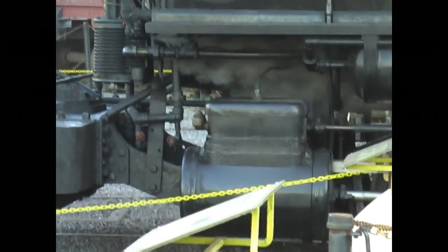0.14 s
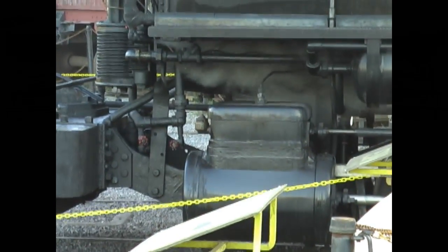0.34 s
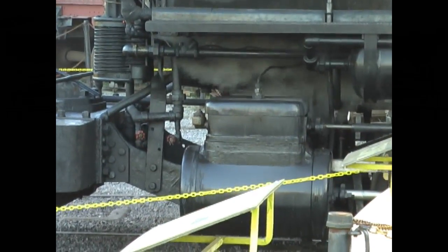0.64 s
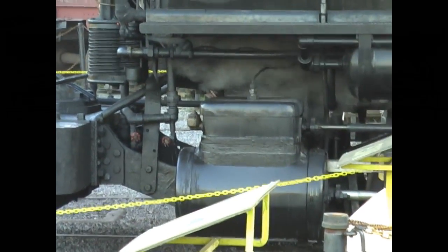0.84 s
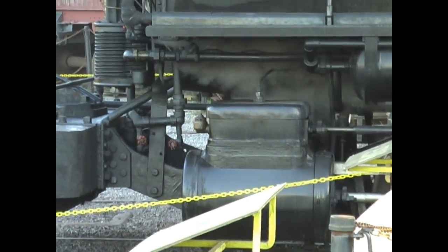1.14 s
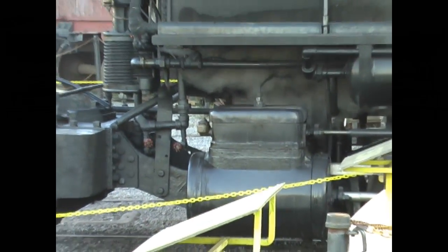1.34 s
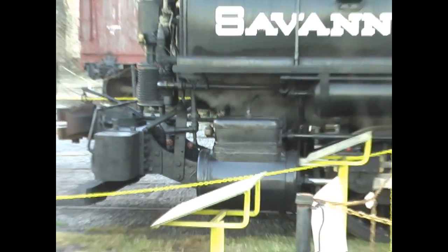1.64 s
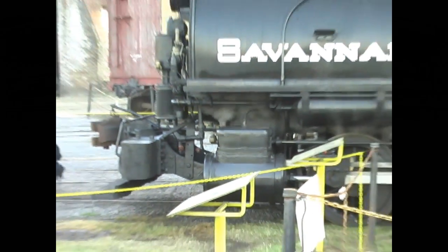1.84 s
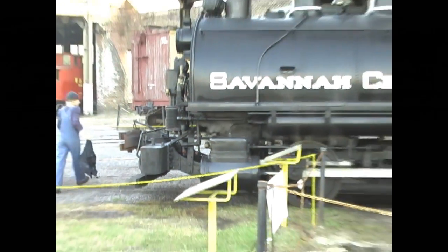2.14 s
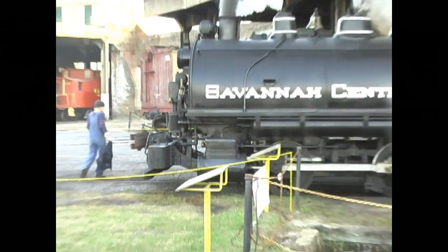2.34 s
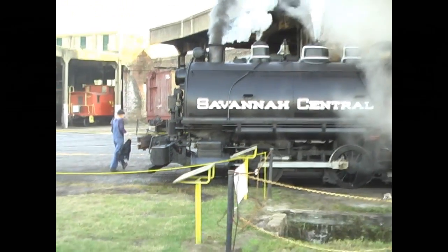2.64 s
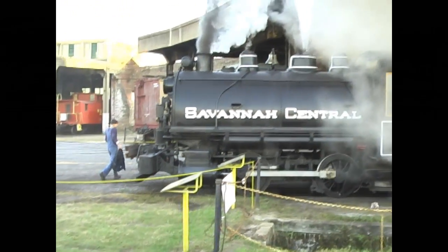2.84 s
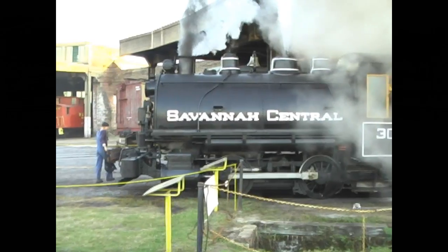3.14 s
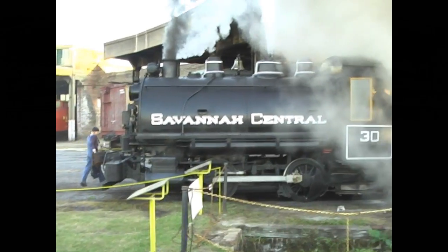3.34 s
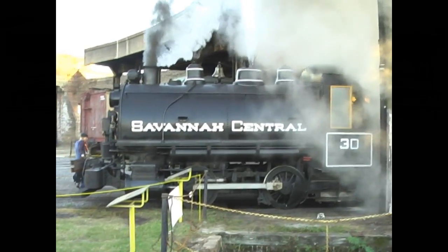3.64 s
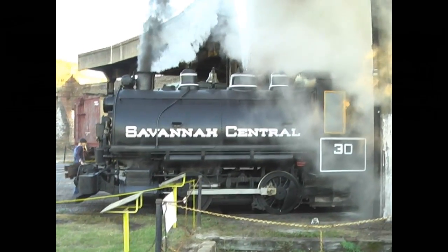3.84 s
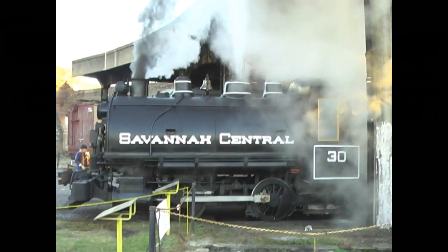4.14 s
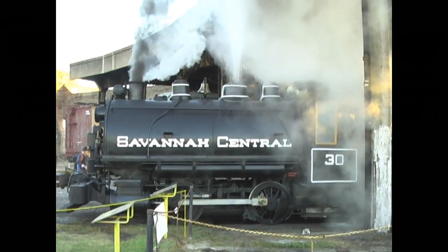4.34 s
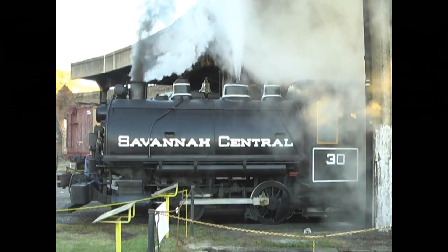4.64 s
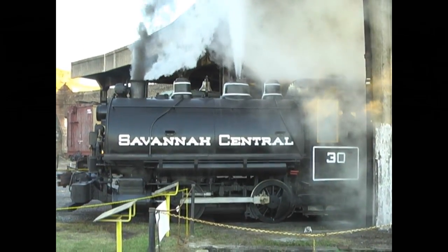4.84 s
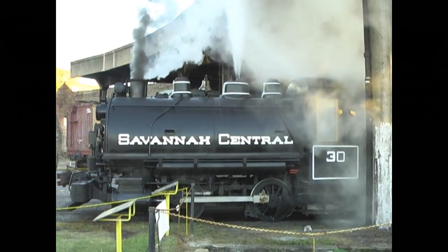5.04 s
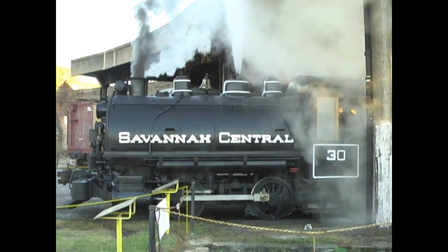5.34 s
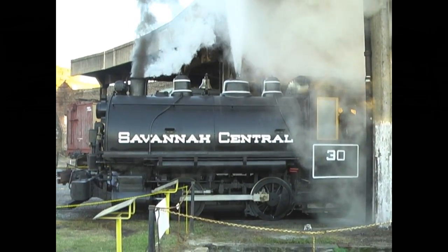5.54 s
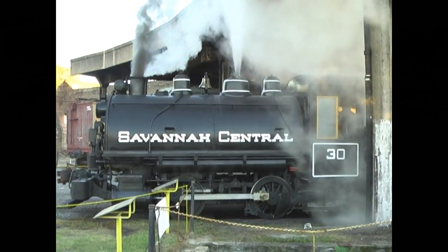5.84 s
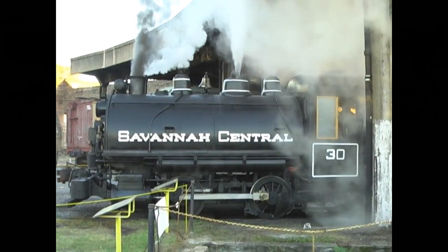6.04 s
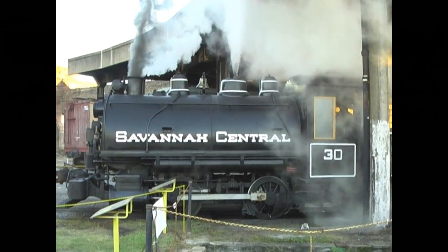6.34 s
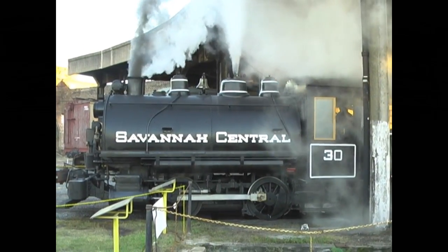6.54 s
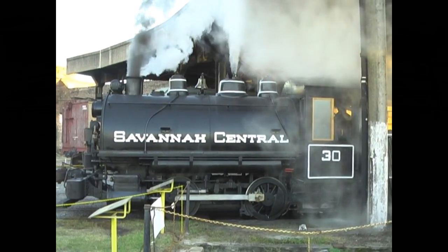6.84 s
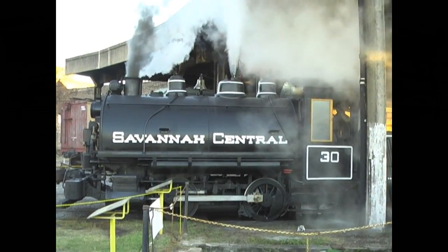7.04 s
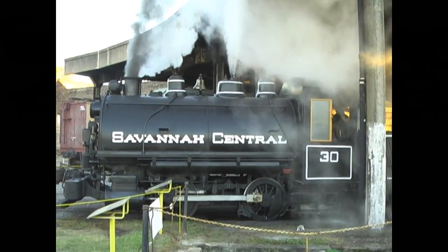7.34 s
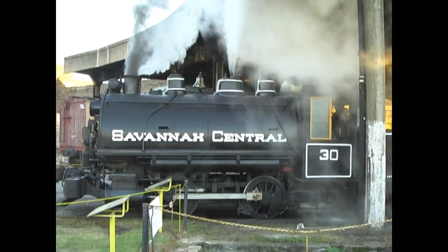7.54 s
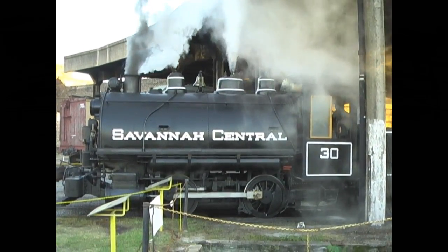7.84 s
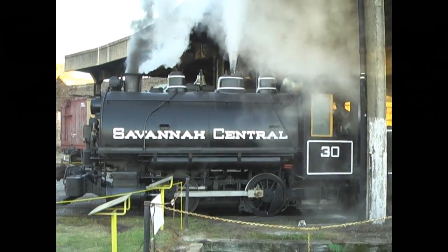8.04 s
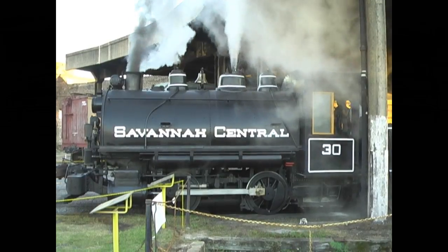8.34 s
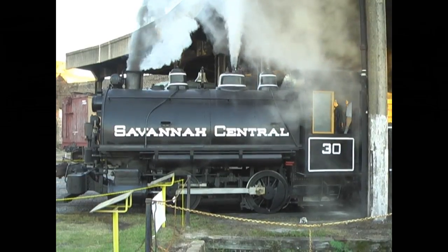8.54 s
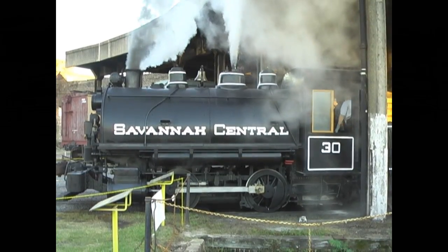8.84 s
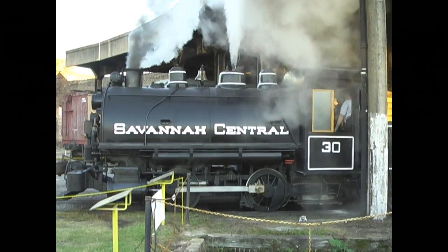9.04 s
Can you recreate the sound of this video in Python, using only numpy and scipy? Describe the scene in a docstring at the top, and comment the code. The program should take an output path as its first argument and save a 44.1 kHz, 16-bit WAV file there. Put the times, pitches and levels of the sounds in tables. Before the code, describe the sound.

A parked steam locomotive blows off steam in an open yard: a loud, continuous, bright hiss already at full level, with small fast flutters. A faint low blower roar and a barely audible hollow hum lie far beneath it. The tone shifts slightly as the stereo camera microphone turns, and around six seconds the hiss turns fuller in the middle while the roar weakens. No other events.

```python
"""In an open yard a standing steam locomotive blows off through its safety valve, heard at a camera's stereo ports.
The jet is turbulent noise, combed by echoes off boiler and ground, over the low noise of the blower's roar.
A hollow hum and a ring inside the hiss are noise in narrow resonances. The camera pans from the cylinders
to the cab, and near 6 s the sound fades over to a later moment with less roar and a fuller middle."""
import sys
import numpy as np
from scipy import signal
from scipy.fft import rfft, irfft, next_fast_len
from scipy.io import wavfile
from scipy.ndimage import uniform_filter1d

SR = 44100
rng = np.random.default_rng(int(sys.argv[2]) if len(sys.argv) > 2 else 0)


def wav_out(sig):
    """Save sig, one row per channel (or a flat mono array), as 16-bit PCM at SR to the path in sys.argv[1]."""
    wavfile.write(sys.argv[1], SR, np.round(np.clip(np.atleast_2d(sig).T, -1, 1) * 32767).astype(np.int16))


N = 405719
# frequency grid in Hz, padded by a tenth of a second so that echoes do not wrap round
HZ = np.fft.rfftfreq(next_fast_len(N + SR // 10), 1 / SR)


def amp(db):
    """Decibel law: 20 dB is a factor of ten in amplitude."""
    return 10 ** (np.asarray(db) / 20)


def unit(x):
    """Normalisation: the mean of the channels gets unit standard deviation."""
    middle = np.atleast_2d(x).mean(axis=0)
    return x / middle.std()


def along(table):
    """Spectral envelope: gain at every frequency from (Hz, dB) points on a log axis."""
    at, db = np.transpose(table)
    return amp(np.interp(np.log(HZ + 1), np.log(at), db))


def colour(x, gain):
    """Linear filtering: convolution in time is multiplication in frequency."""
    return irfft(rfft(x, 2 * len(HZ) - 2) * gain)[:N]


def eddies(shape, bins, frames):
    """Correlated randomness: a chance field smoothed over frequency bins and time frames; spread 1."""
    field = rng.standard_normal(shape)
    for _ in range(2):
        field = uniform_filter1d(field, int(bins), axis=0)
        field = uniform_filter1d(field, int(frames), axis=1)
    return field / field.std()


def turbulence():
    """Turbulent fluctuation: white noise whose level wavers on several scales of frequency and time."""
    frame = 512  # samples
    _, t, z = signal.stft(rng.standard_normal(N), SR, nperseg=frame)
    surge_db = 0.23 * eddies((1, len(t)), 1, 4)  # all bands together
    drift_db = 0.5 * eddies(z.shape, 3, 48)  # narrow bands, slowly
    flicker_db = 0.63 * eddies(z.shape, 37, 2)  # broad bands, fast
    return signal.istft(z * amp(surge_db + drift_db + flicker_db), SR, nperseg=frame)[1][:N]


def jet(source, scatter, spectrum, echoes, body, wide):
    """Jet noise and comb filtering: turbulence meets its own short echoes and reaches two ports."""
    paths = 1  # the direct sound
    for lag_ms, gain, dull_hz in echoes:
        delay = np.exp(-2j * np.pi * HZ * lag_ms / 1000)
        paths = paths + gain * delay / (1 + (HZ / dull_hz) ** 2)
    low_cut = np.minimum(HZ / 940, 1) ** 4  # the hiss falls away below 940 Hz
    jet_gain = along(spectrum) * paths * low_cut

    at, share, radians = np.transpose(body)
    lean = np.interp(HZ, at, share) * np.exp(1j * np.interp(HZ, at, radians))
    middle = colour(source, jet_gain)
    side = colour(source, jet_gain * lean) + colour(scatter, jet_gain * along(wide))
    return unit(np.array([middle + side, middle - side]))


# How far the roar differs between the ports. Each row: frequency in Hz, side against middle in dB.
ROAR_SIDE = [(30, -15), (130, -11), (250, -7.5), (900, -11)]


def roar(spectrum, lean):
    """Diffuse field: low draught noise fills the yard, so part of it is unrelated at the two ports."""
    middle = colour(turbulence(), along(spectrum))
    scattered = colour(rng.standard_normal(N), along(spectrum) * along(ROAR_SIDE))
    side = lean * middle + scattered
    return unit(np.array([middle + side, middle - side]))


def hollow(hz, width_hz):
    """Resonance: noise sings in one narrow band, full width taken at half amplitude."""
    return unit(colour(rng.standard_normal(N), 1 / (1 + (2 * (HZ - hz) / width_hz) ** 2)))


def ring():
    """Resonance: a narrow ring inside the hiss."""
    return hollow(1072, 30)


# Jet spectra before and after the pan. Each row: frequency in Hz, relative level in dB per Hz.
JET_ASIDE = [(950, -18.5), (1150, -15.5), (2000, -11), (2900, -9.5), (3800, -12.5), (4600, -9), (4900, -6),
             (6000, -2), (7700, -0.6), (8700, -3.5), (11500, -10), (13300, -17), (14400, -26), (15600, -30)]
JET_FACING = [(950, -22), (1150, -12), (2000, -12), (2900, -8.5), (3800, -10), (4600, -9.5), (4900, -3.5),
              (6000, -1.5), (7700, -1.5), (8700, -2.5), (11500, -8.5), (13300, -19.5), (14400, -23.3),
              (15600, -31.4)]
# Early echoes off metal and ground. Each row: lag in ms, signed gain, frequency in Hz where dulling halves it.
ECHO_ASIDE = [(0.623, 0.04, 20000), (0.721, 0.15, 8000), (1.024, -0.04, 10300), (1.744, -0.04, 20000),
              (1.88, 0.09, 4000), (2.609, -0.3, 2700), (2.674, 0.5, 1700), (2.917, -0.09, 2800),
              (4.22, -0.16, 1500), (4.468, -0.04, 7000)]
ECHO_FACING = [(0.585, -0.04, 20000), (1.561, -0.31, 1500), (1.642, 0.06, 9400), (1.754, -0.04, 16200),
               (2.628, -0.36, 1900), (2.715, 0.49, 1800), (3.47, -0.09, 2500), (3.684, -0.09, 2800),
               (4.597, 0.14, 1500), (5.777, 0.07, 2500)]
# What the camera body adds left and takes right. Each row: frequency in Hz, share of the hiss, phase in radians.
BODY_ASIDE = [(7000, 0, 0), (9600, .2, 0), (10200, .45, .2), (11000, .7, -.45), (12200, .72, -1.1),
              (13500, .5, -1.35), (14600, .3, -1.5), (15300, 0, -1.5)]
BODY_FACING = [(5400, 0, 3.1), (6300, .09, 3), (7800, .18, 1.7), (9200, .23, .6), (10600, .27, 0),
               (11700, .38, -.7), (12300, .35, -1.6), (13500, .11, -3), (14500, 0, -4)]
# Scattered hiss that differs between the ports. Each row: frequency in Hz, level against the jet in dB.
WIDE_ASIDE = [(1000, -20), (1500, -28), (3000, -34), (3700, -21), (4500, -35), (5500, -24), (7500, -19),
              (10000, -11), (12000, -7), (14500, -8), (15300, -30)]
WIDE_FACING = [(1000, -22), (1500, -58), (3000, -65), (3500, -16.5), (4200, -21), (5000, -41), (6000, -21),
               (9500, -22), (12000, -9), (13800, -11), (14800, -30)]
# Blower roar before the fade. Each row: frequency in Hz, relative level in dB per Hz.
ROAR_EARLY = [(25, -12), (90, -12), (120, -2.5), (140, -5.5), (250, -1.5), (450, -1.5), (570, -0.5),
              (600, 3.5), (720, 2.5), (900, -0.5), (1300, -1.5), (2500, -50)]


def early():
    """Superposition: jet, roar, hum and ring add while the camera pans; jet and ring grow as it turns."""
    t = np.arange(N) / SR
    pan = 0.5 - 0.5 * np.cos(np.pi * np.interp(t, (2.1, 4), [0, 1]))  # smooth swing from 2.1 s to 4 s

    def turned(before_db, after_db):
        """Gain moving with the pan between two levels, linear in dB."""
        return amp(before_db + pan * (after_db - before_db))

    source, scatter = turbulence(), turbulence()
    aside = jet(source, scatter, JET_ASIDE, ECHO_ASIDE, BODY_ASIDE, WIDE_ASIDE)
    facing = jet(source, scatter, JET_FACING, ECHO_FACING, BODY_FACING, WIDE_FACING)
    hiss = turned(-14, -13.5) * ((1 - pan) * aside + pan * facing)
    draught = amp(-39.5) * roar(ROAR_EARLY, lean=0.05)  # slightly stronger left

    hum_db = -51.5 - 13 * np.maximum(t - 4.9, 0)  # dies away at 13 dB per second from 4.9 s
    hum = amp(hum_db) * hollow(373, 20)  # a hollow hum in the draught
    return hiss + draught + hum + turned(-51, -45.5) * ring()


# Jet spectrum after the fade. Each row: frequency in Hz, relative level in dB per Hz.
JET_LATER = [(950, -19.5), (1150, -14), (2000, -15), (2900, -6), (3800, -9), (4600, -10), (4900, -4.5),
             (6000, -5), (7700, -0.25), (8700, -5), (11500, -11.5), (13300, -22.5), (14400, -26),
             (15600, -31.0)]
# Early echoes after the fade. Each row: lag in ms, signed gain, frequency in Hz where dulling halves it.
ECHO_LATER = [(0.49, 0.14, 10100), (0.631, 0.04, 20000), (1.629, -0.5, 1700), (1.643, 0.25, 5200),
              (2.071, -0.08, 5500), (2.616, -0.23, 2800), (2.7, 0.5, 2000), (3.319, 0.12, 2100),
              (3.879, 0.13, 1700), (4.545, 0.19, 1500)]
# Blower roar after the fade. Each row: frequency in Hz, relative level in dB per Hz.
ROAR_LATER = [(25, -8), (90, -11), (115, 1.5), (140, -2.5), (250, -2), (550, -1.5), (600, 3), (720, 2),
              (900, -2), (1300, -21), (2500, -44)]


def later():
    """Superposition: jet, a weaker roar and ring add, with the camera at rest."""
    hiss = jet(turbulence(), turbulence(), JET_LATER, ECHO_LATER, BODY_FACING, WIDE_FACING)
    draught = amp(-44) * roar(ROAR_LATER, lean=-0.05)  # slightly stronger right
    return amp(-13.6) * hiss + draught + amp(-48.5) * ring()


def scene():
    """Incoherent addition: a straight fade between unrelated noises dips in the middle."""
    over = np.interp(np.arange(N) / SR, (5.945, 6.015), [0, 1])  # fade start and end in seconds
    return (1 - over) * early() + over * later()


def record(dry):
    """Quadratic distortion: loud hiss bends the capsules, so pressure peaks outreach the troughs."""
    bass_cut_hz, top_hz = 107, 15720
    bent = dry + 0.10 * dry ** 2
    high_pass = signal.butter(1, bass_cut_hz, "high", fs=SR, output="sos")
    thin = signal.sosfilt(high_pass, bent - bent.mean())
    clipped = np.clip(thin, -0.97, 0.97)
    top_cut = signal.ellip(14, 0.2, 80, top_hz, fs=SR, output="sos")  # ripple and stop band in dB
    return signal.sosfilt(top_cut, clipped)


dry = scene()
out = record(dry)
wav_out(out)
```